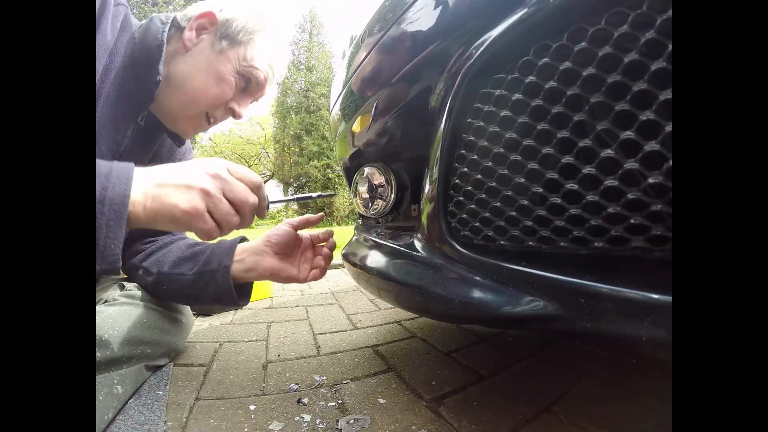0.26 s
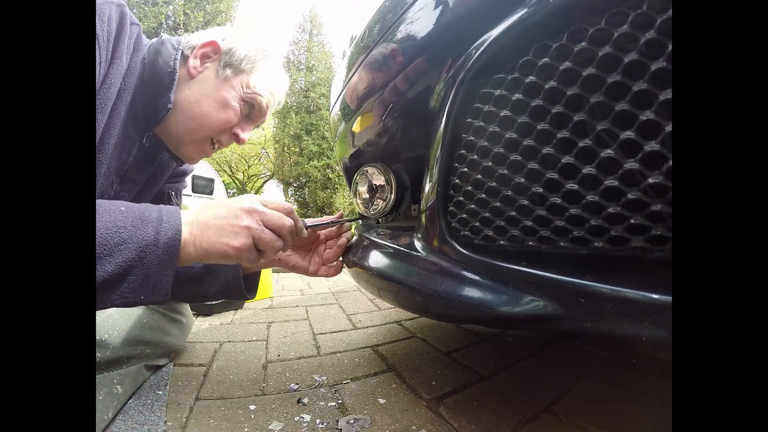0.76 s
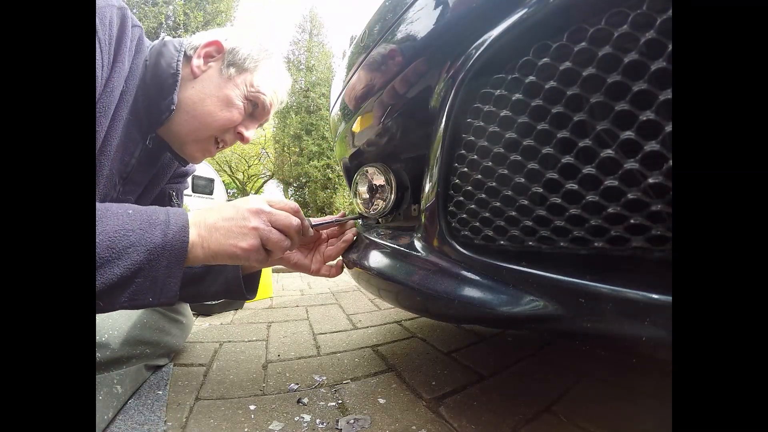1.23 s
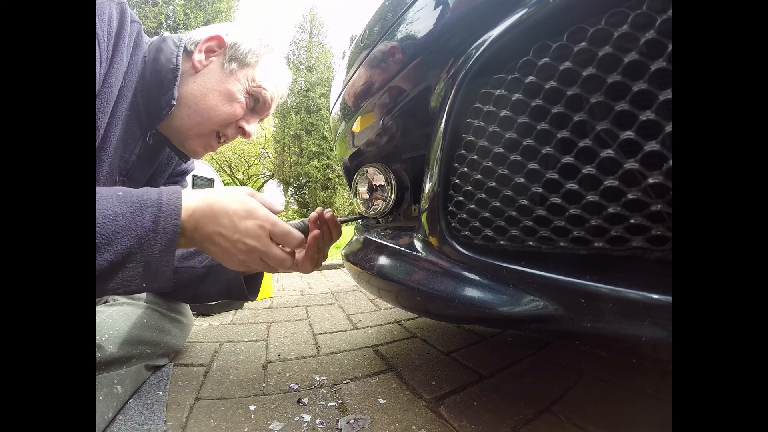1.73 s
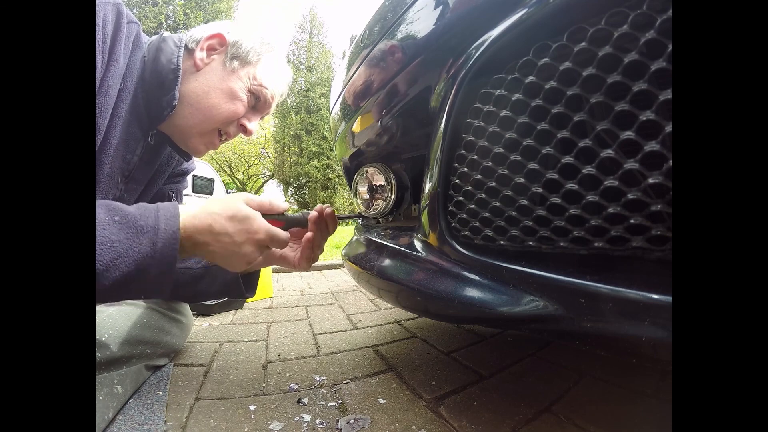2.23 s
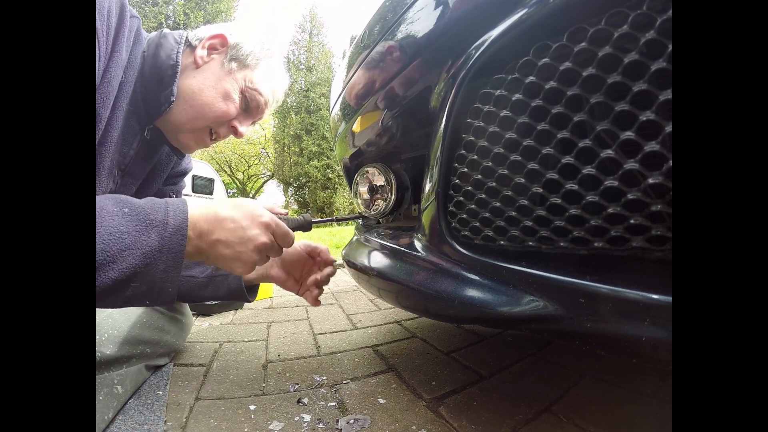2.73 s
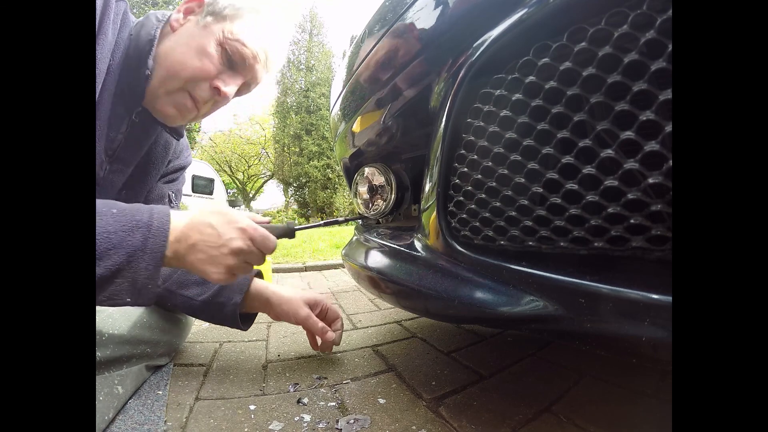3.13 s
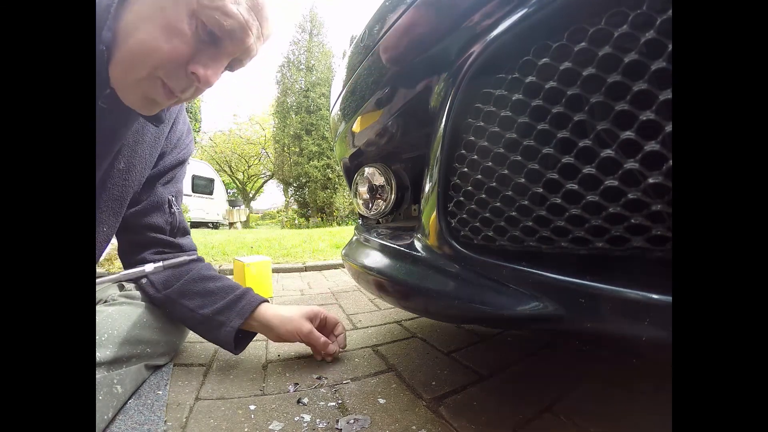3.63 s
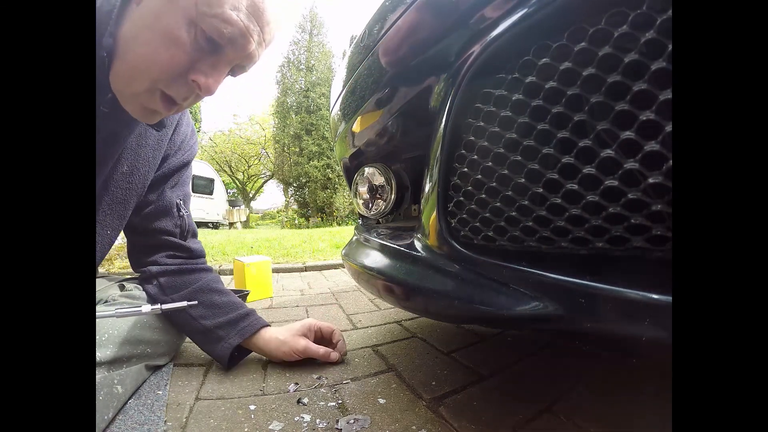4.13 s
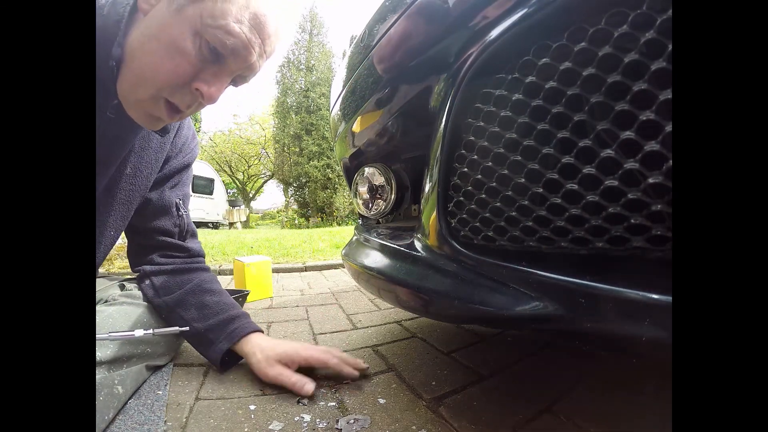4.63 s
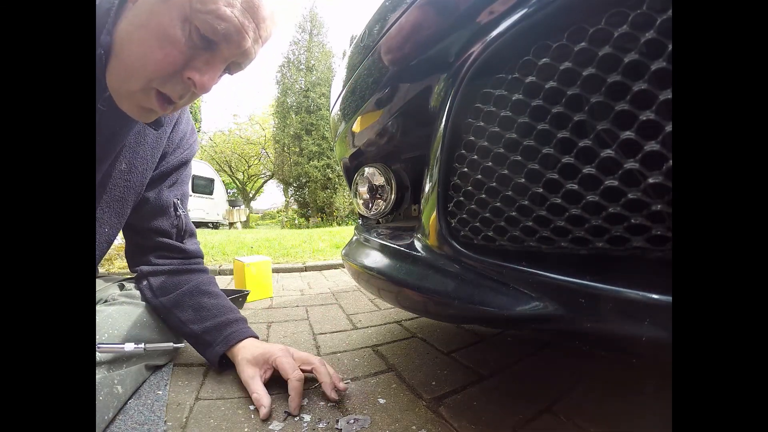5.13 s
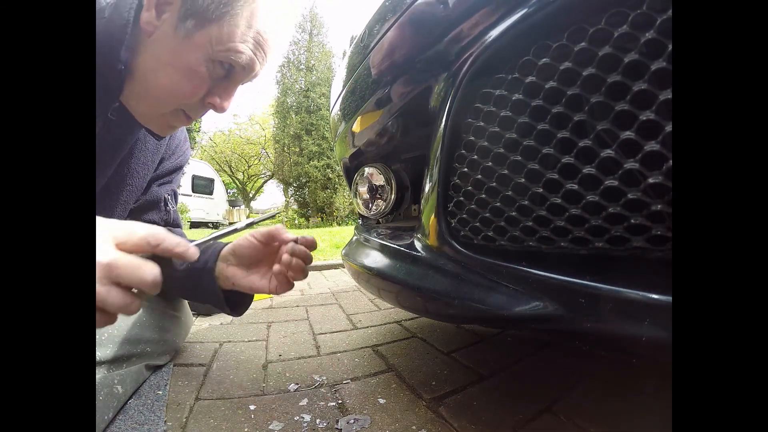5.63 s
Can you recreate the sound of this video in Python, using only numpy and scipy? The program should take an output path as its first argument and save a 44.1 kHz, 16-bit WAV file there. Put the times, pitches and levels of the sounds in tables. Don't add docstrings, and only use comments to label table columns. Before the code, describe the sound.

Deep engine rumble rises, shifts down and throbs over road wash, with close screwdriver clicks, dull plastic knocks and faint hand rubbing outdoors.

```python
import sys
import numpy as np
from scipy import signal
from scipy.io import wavfile
from scipy.ndimage import uniform_filter1d

SR = 44100
rng = np.random.default_rng(int(sys.argv[2]) if len(sys.argv) > 2 else 0)


def invert_db(x):
    u = np.asarray(x, float) / 20
    return 10 ** u


def unload_audio(sound):
    columns = np.transpose(np.atleast_2d(sound))
    steps = np.round(np.clip(columns, -1, 1) * 32767)
    wavfile.write(sys.argv[1], SR, steps.astype(np.int16))


N = 259308


def evened(x):
    return x / np.sqrt(np.mean(x ** 2) + 1e-20)


def read(points, hz):
    f, value = np.transpose(points)
    return np.interp(np.log(hz + 1), np.log(f + 1), value)


def add(mix, s, sound):
    part = mix[round(s * SR):][:len(sound)]
    part += sound[:len(part)]


def drift(count, span):
    size = max(int(span), 2)
    smooth = uniform_filter1d(rng.standard_normal(count), size)
    return evened(uniform_filter1d(smooth, size))


def noise(field_db, size):
    real, imaginary = rng.standard_normal(field_db.shape[::-1] + (2,)).T
    spectrum = (real + 1j * imaginary) * invert_db(field_db)
    return signal.istft(spectrum, nperseg=size, noverlap=size * 3 // 4)[1][:N]


def band(x, lo_hz, hi_hz):
    edges_hz = [lo_hz, min(hi_hz, SR / 2 - 100)]
    return signal.sosfilt(signal.butter(2, edges_hz, "band", fs=SR, output="sos"), x)


def stroke(length_s, rise_share, ends_db):
    u = np.arange(0, length_s, 1 / SR) / length_s
    away = np.where(u < rise_share, 1 - u / rise_share, (u - rise_share) / (1 - rise_share))
    return invert_db(ends_db * away) * signal.windows.tukey(len(u), .15)


def ring(t, hz, t60):
    onset = np.sin(np.pi / 2 * np.minimum(t * hz / 1.38, 1)) ** 2
    return invert_db(-60 * t / t60) * np.sin(2 * np.pi * hz * t) * onset


# (time [s], level [dB])
TRAFFIC = [(0, 1), (.44, 0.5), (.7, 3), (1.3, 0.5), (1.74, .3), (2.13, 0), (2.75, -1.9), (3.2, 0),
           (3.6, 1.3), (4.1, -1), (5.1, -1), (5.65, 1.5), (5.88, -0.7)]
# (frequency [Hz], density [dB per Hz])
WASH_COLOUR = [(12, -40), (20, -9), (49, -1.5), (78, -3), (175, -13.5), (306, -20), (416, -24), (597, -28),
               (686, -27), (1010, -28.5), (1160, -30.5), (1580, -31), (1870, -36), (13900, -69),
               (15500, -75)]
# (frequency [Hz], width [Hz], level [dB])
ROAR_HUMPS = [(242, 44, 4.5), (315.6, 18, 5), (692, 55, 3.5), (980, 190, 3)]
REGION_FOLLOW = (.4, 0.45, .95, 0.18)
REGION_SWELLS = (2, .6, .2, .3)
ONCOMING_S, ONCOMING_DB_PER_S = 3.67, (-3, 0.7, 0.27, 0.94)


def road(patchy_db=1.15, gust_db=0.07):
    frames, hz = N // 512 + 6, np.fft.rfftfreq(2048, 1 / SR)
    t = np.arange(frames) * 512 / SR
    density_db = np.interp(t, *np.transpose(TRAFFIC))
    since_oncoming = np.maximum(t - ONCOMING_S, 0)
    swell = np.array([follow * density_db + swell_db * drift(frames, 14) + slope * since_oncoming
                      for follow, swell_db, slope in zip(REGION_FOLLOW, REGION_SWELLS, ONCOMING_DB_PER_S)])
    place = np.interp(np.log(hz + 1), np.log([40, 200, 900, 3500]), np.arange(4))
    share = np.maximum(1 - abs(place[:, None] - np.arange(4)), 0)
    humps = sum(db * np.exp(-((hz - f) / width) ** 2) for f, width, db in ROAR_HUMPS)
    patches = rng.standard_normal((frames, len(hz))).T
    patches = evened(uniform_filter1d(uniform_filter1d(patches, 14, 0), 6, 1))
    colour = (read(WASH_COLOUR, hz) + humps)[:, None]
    field = colour + share @ swell + patchy_db * patches + gust_db * drift(frames, 5)
    return invert_db(-30.5) * evened(noise(field, size=2048))


# (start [s], end [s], frequency [Hz], glide [Hz per s], peak level [dB])
HUMS = [(0, 1.2, 244, -1.5, -39), (2.5, 3.98, 252, 1.5, -48), (2.5, 4.0, 313, 3, -49),
        (5, 7.2, 192, 4, -36.5), (4.5, 5.4, 31.5, 3.5, -36), (5.5, 5.93, 36, 1, -31),
        (-1.2, 0.42, 89, -4, -35.5), (0.5, 0.34, 150, 11, -33.5), (4.5, 8.4, 130, -1.5, -39),
        (4.95, 4.7, 325, 0, -41), (1.5, 1.9, 238, 24, -42.5), (5.0, 5.55, 490, 3, -49.5),
        (3.5, 3.9, 120, 7, -38), (1.2, 2.7, 37, -1.5, -30.5)]


def drones(width_hz=9, ends_db=-9, steady=0.57):
    lead = SR
    out = np.zeros(N + 2 * lead)
    span = SR / 2 / width_hz
    for start, end, hz, glide, db in HUMS:
        swell = stroke(end - start, 1 / 2, ends_db)
        gliding_hz = hz + glide * np.arange(len(swell)) / SR
        carrier = np.exp(2j * np.pi * np.cumsum(gliding_hz) / SR)
        fuzz = drift(len(swell), span) + 1j * drift(len(swell), span)
        add(out, start + 1, invert_db(db) * (carrier * (steady + fuzz)).real * swell)
    return out[lead:lead + N]


BEAT_TIMES = [3.68, 3.79, 3.94, 4.14, 4.28, 4.42, 4.62, 4.81, 5.11, 5.34, 5.95]


def engine(rows, waver, flutter_db, undertone_db, multiples_db=(0,), pipe=((1, 0),), neighbour=0):
    s, hz, load_db, boom_db = np.transpose(rows)
    t = np.arange(s[0], s[-1], 1 / SR)
    hz, load_db, boom_db = np.interp(t, s, hz), np.interp(t, s, load_db), np.interp(t, s, boom_db)
    turns = np.cumsum(hz * (1 + waver * drift(len(t), 2500))) / SR
    slip = 0.09 * drift(len(t), 1000)
    beats = np.interp(t, BEAT_TIMES, np.arange(len(BEAT_TIMES))) + .5
    tones = invert_db(load_db + read(pipe, hz) + undertone_db) * np.cos(2 * np.pi * 0.22 * turns)
    for k, db in enumerate(multiples_db, 1):
        turn = k * turns + 0.09 * k * k * slip + rng.random()
        wave = np.cos(2 * np.pi * turn)
        if k == 1:
            wave += neighbour * np.cos(2 * np.pi * (turn + beats))
        level_db = load_db + db + (k > 1) * boom_db + read(pipe, k * hz)
        flutter = flutter_db * np.sqrt(k) * drift(len(t), 1500)
        tones += invert_db(level_db + flutter) * wave
    return s[0], np.sqrt(2) * tones * signal.windows.tukey(len(t), .06)


# (time [s], firing rate [Hz], level [dB], boom of the multiples [dB])
EARLY_ENGINE = [
    (0, 51.8, -30, 0),
    (.3, 56.2, -35, 2),
    (.55, 61.3, -27.5, 0),
    (.95, 66.2, -32, 0),
    (1.08, 62.4, -29.5, 0),
    (1.25, 64.4, -31, 0),
]
LATE_ENGINE = [
    (2.6, 44.2, -37, 0),
    (2.8, 47.7, -32, 0),
    (3.08, 49.85, -30.5, 0),
    (3.5, 53.6, -41, 0),
    (3.65, 54, -36.5, 0),
    (3.75, 53, -44, 0),
]


def far_engines():
    out = np.zeros(N)
    add(out, *engine(EARLY_ENGINE, waver=.0057, flutter_db=1, undertone_db=-14))
    add(out, *engine(LATE_ENGINE, waver=.006, flutter_db=1.2, undertone_db=-14))
    return out


# (time [s], firing rate [Hz], load level [dB], extra boom of the multiples [dB])
FIRST_PULL = [
    (.75, 49, -4, 0),
    (1.05, 53.3, -0.5, -7),
    (1.4, 58.1, -4, 3),
    (1.77, 62.7, 1, 0.5),
    (2.06, 67.13, -1, -0.5),
    (2.35, 70.57, 3, -0.5),
    (3.0, 80.35, -0.5, 0.5),
    (3.38, 86.2, 0.5, -2),
    (3.62, 88.3, -7, -4.5),
]
SECOND_PULL = [
    (3.64, 70.5, -13.5, 8),
    (4.0, 63.1, -9, 0.5),
    (4.14, 59.32, -15, 7.5),
    (4.35, 63.65, -12, -1.5),
    (4.55, 63.3, -8, 5.5),
    (4.9, 65.3, -6, 7),
    (5.45, 69, -3, 2.5),
    (5.65, 70.7, -4, -6),
    (5.88, 71.2, -6, 2),
]
# (frequency [Hz], gain [dB])
EXHAUST_GAIN = [(50, -28.5), (66, -21.5), (86, -29.5), (100, -31.5), (124, -20.5), (136, -28), (158, -26.5),
                (175, -35.5)]
MULTIPLE_LEVELS = (-0.5, -3.5, -10, -14)


def heavy_vehicle(flutter_db=.5, neighbour=.62):
    out = np.zeros(N)
    shared = dict(flutter_db=flutter_db, multiples_db=MULTIPLE_LEVELS, pipe=EXHAUST_GAIN)
    add(out, *engine(FIRST_PULL, waver=0.0046, undertone_db=-21, **shared))
    add(out, *engine(SECOND_PULL, waver=0.0038, undertone_db=-27, neighbour=neighbour, **shared))
    return out


# (peak time [s], length [s], peak level [dB], tilt of the top octave [dB])
HAND_RUBS = [(.06, 0.1, -60, -8), (.175, .05, -66, -5), (.26, .06, -73, -10), (0.393, .08, -69, -3),
             (0.473, 0.034, -57, -18), (.495, .03, -69, -15), (.535, .04, -71, -6), (0.596, 0.092, -76, -3),
             (1.09, 0.014, -63, -12), (1.262, 0.037, -54, -16), (1.471, .1, -76, 6),
             (1.583, 0.16, -62, -6.5), (1.705, 0.11, -69.5, 2.5), (1.872, 0.19, -64.5, -2.5),
             (2.035, .05, -66, -1), (2.116, 0.046, -74.5, 9), (2.208, 0.18, -69, -2), (2.39, .14, -70, 4),
             (3.097, .025, -61.5, -18), (3.28, 0.089, -80, 6), (3.462, .13, -70, 3), (4.45, 0.27, -73, -21),
             (4.724, .18, -64.5, -9), (4.84, .12, -77, -12), (4.922, .06, -77, -8),
             (5.15, 0.44, -69.5, -18), (5.45, 0.24, -66, -10), (5.568, .06, -69, -7),
             (5.7, 0.29, -65.5, -12), (5.848, 0.18, -66, -7)]
# (frequency [Hz], density [dB per Hz])
SKIN_COLOUR = [(800, -18), (2000, 1), (4500, 2.5), (7000, -5), (9000, -16), (12000, -26)]


def rubs(grainy_db=2.0, rise_share=0.47, ends_db=-13.5):
    frames, hz = N // 64 + 6, np.fft.rfftfreq(256, 1 / SR)
    flicker = grainy_db * drift(frames, 2.4)
    top_colour = [(6000, -11), (10500, -3.0), (13000, -3), (15200, -6)]  # (Hz, dB per Hz)
    body = evened(noise(read(SKIN_COLOUR, hz)[:, None] + flicker, size=256))
    top = evened(noise(read(top_colour, hz)[:, None] + flicker, size=256))
    body_level, top_level = np.zeros((2, N))
    for s, length, db, top_db in HAND_RUBS:
        slide = invert_db(db + 9.0) * stroke(length, rise_share, ends_db)
        start = s - rise_share * length
        add(body_level, start, slide)
        add(top_level, start, slide * invert_db(top_db - 2.0))
    return body * body_level + top * top_level


TIP_DRAGS = [
    (0.022, 0.072, -60, -46),
    (0.09, .012, -45, -46),
    (0.128, .012, -46, -62),
    (0.144, 0.011, -62, -44),
    (.168, .082, -56, -64),
]


def scrape(lo_hz=3700, hi_hz=5200, slips_per_s=1500):
    slips = rng.standard_normal(N) * (0.27 + (rng.random(N) < slips_per_s / SR) * 3)
    rasp, level = evened(band(slips, lo_hz, hi_hz)), np.zeros(N)
    for s, length, first_db, last_db in TIP_DRAGS:
        size = round(length * SR)
        add(level, s, invert_db(np.linspace(first_db, last_db, size)) * signal.windows.tukey(size, .2))
    return rasp * level


# (time [s], peak level [dB], frequency [Hz], ring time [s])
BUMPER_KNOCKS = [(0.453, -34, 890, 0.063), (1.084, -27, 994, 0.02), (1.252, -21, 870, 0.019),
                 (1.248, -29, 730, 0.027), (1.26, -25.5, 960, .02), (1.269, -29, 830, 0.046),
                 (1.33, -28, 810, 0.028), (1.3, -33.5, 970, .03), (3.0945, -24, 970, 0.031),
                 (0.088, -25.5, 168, 0.23), (1.1, -30, 830, 0.019), (1.22, -35, 1370, 0.042),
                 (.0897, -30, 1020, 0.027), (.0905, -21.5, 710, 0.021), (.1102, -30, 1040, 0.023)]


def knocks():
    t, out = np.arange(9000) / SR, np.zeros(N)
    for s, db, hz, t60 in BUMPER_KNOCKS:
        pair = np.sin(2 * np.pi * hz * t) + 0.16 * np.sin(2 * np.pi * hz * 1.1 * t)
        onset = np.minimum(t * hz / 1.2, 1)
        add(out, s, invert_db(db + 2.0 - 60 * t / t60) * pair * onset)
    return out


# (time [s], peak level [dB], main ring [Hz], rattle time [s])
TIP_TICKS = [(.0098, -31, 3940, 0.03), (0.0126, -31.5, 2450, .03), (.0482, -38, 4800, .03),
             (0.0884, -15, 3800, 0.016), (.089, -22, 5700, 0.013), (.109, -19.5, 3700, 0.018),
             (.1168, -21.5, 3800, 0.035), (0.1194, -29, 4300, 0.03), (0.16, -21.5, 9300, 0.01),
             (0.4556, -16.5, 3960, 0.022), (0.4551, -19, 6200, .014), (0.4567, -28.5, 2060, .02),
             (.538, -37, 3520, .03), (0.8703, -41.5, 6460, 0.013), (1.0846, -34, 3620, .02),
             (1.0855, -40, 5800, .02), (1.257, -33, 6800, 0.021), (1.257, -34, 2300, .028),
             (1.263, -32, 3700, 0.036), (1.266, -33.5, 11500, .015), (1.271, -37, 3660, 0.034),
             (1.271, -34, 2480, 0.09), (2.117, -49, 11540, .034), (2.5236, -42, 6200, .016),
             (2.9, -51, 12480, .015), (3.072, -46, 5600, .043), (3.094, -38, 3570, .03),
             (3.096, -53, 7400, .02), (3.451, -44, 5502, .015), (4.955, -45, 12000, .019)]
# (frequency [Hz], level [dB], decay time t60 [s])
TOOL_MODES = [(2090, -13, 0.08), (2780, -6, 0.095), (3620, 2, 0.28), (3870, -4, 0.2), (4560, 2.5, 0.17),
              (6700, -42.5, 5.0), (11800, -19, 0.06), (13800, -19, 0.068)]
# (main ring [Hz], level [dB])
EDGE_LEVEL = [(2400, -30), (3700, -17), (6500, -12), (12000, -10)]
BODY_LEVEL = [(2400, -12), (3700, -4.5), (5500, -26), (9500, -29)]


def ticks(scatter_db=-27, scatter_t60=0.077, shared_db=-25, bounce_s=0.0018, cycles=9, upper_db=-4):
    t, out = np.arange(5000) / SR, np.zeros(N)
    shared = sum(invert_db(db) * ring(t, hz, t60) for hz, db, t60 in TOOL_MODES)
    for s, db, hz, t60 in TIP_TICKS:
        grit, chance = rng.standard_normal(len(t)), rng.random(12)
        edge_db = read(EDGE_LEVEL, hz) + 0.36 * max(db + 17, 0)
        body_db = read(BODY_LEVEL, hz)
        at = np.append(0, np.cumsum(bounce_s * (0.72 + 0.9 * chance)))
        blows = grit * invert_db(-19.5 - 60 * t / t60)
        signs = np.cos(np.pi * np.arange(len(at)))
        blows[(at * SR).astype(int)] += invert_db(-4 * (at > 0) - 60 * at / t60) * signs
        upper = ring(t, min(hz * 1.485, 13500), cycles / hz / 2.6)
        main = ring(t, hz, cycles / hz) + invert_db(upper_db) * upper
        shapes = main, ring(t, 12800, 0.002), ring(t, 2300, 0.005)
        parts = [signal.fftconvolve(blows, shape)[:len(t)] for shape in shapes] + [shared]
        levels_db = 0, edge_db, body_db, shared_db + body_db
        sound = sum(invert_db(g) * p / abs(p).max() for g, p in zip(levels_db, parts))
        scatter = evened(band(grit[::-1], hz / 2, hz * 1.1)) * invert_db(scatter_db - 60 * t / scatter_t60)
        scatter *= np.minimum(t / 0.0014, 1)
        add(out, s, invert_db(db) * (sound / abs(sound).max() + scatter))
    return out


def scene():
    distant = road() + drones() + far_engines() + heavy_vehicle()
    close = rubs() + scrape() + knocks() + ticks()
    return (distant + close)[None]


def patchy_top(x, from_hz=12800, share=0.17, depth_db=-25, steady_edge_hz=15200, sharp_db=27):
    hz, t, z = signal.stft(x, SR, nperseg=256)
    top = abs(z[0, hz > from_hz]).mean(0)
    calm = top < np.median(top) * invert_db(sharp_db)
    very_top = (hz > steady_edge_hz)[:, None]
    x = signal.istft(z * invert_db(2 * depth_db * very_top * calm), SR, nperseg=256)[1]
    hz, t, z = signal.stft(x, SR, nperseg=2048)
    odds = share * (rng.random(len(t)) < .4) * np.arange(1, 7)[:, None] / 2
    dropped = rng.random((len(t), 6)).T < odds
    row = np.clip((hz - from_hz) // 450, -1, 5).astype(int)
    holes = dropped[row] * (row >= 0)[:, None]
    return signal.istft(z * invert_db(depth_db * holes), SR, nperseg=2048)[1][:, :N]


def top_cut(x):
    return signal.sosfilt(signal.butter(12, 16450, fs=SR, output="sos"), x)


def record(dry):
    hissy = dry + invert_db(-69.5) * rng.standard_normal(dry.shape)
    cut = signal.sosfilt(signal.butter(2, 22, "high", fs=SR, output="sos"), hissy)
    cut = cut * np.minimum(np.arange(N)[::-1] / 300, 1)
    edge = signal.firwin(255, 16200, window=("kaiser", 8), fs=SR)
    finished = patchy_top(signal.oaconvolve(cut, edge[None], "same"))
    return top_cut(finished)


dry = scene()
out = record(dry)
unload_audio(out)
```